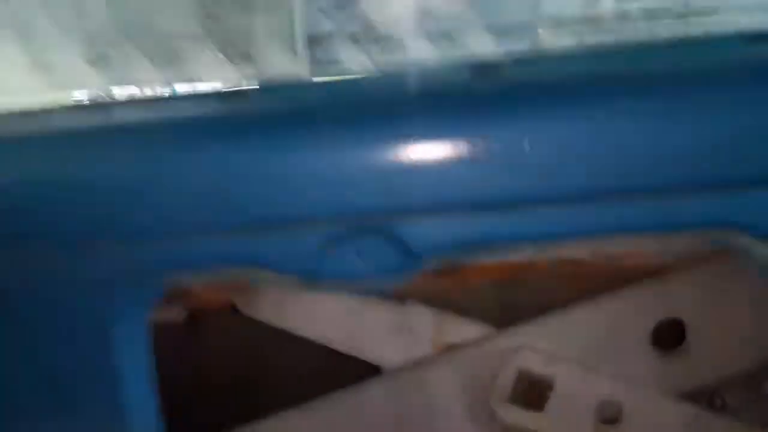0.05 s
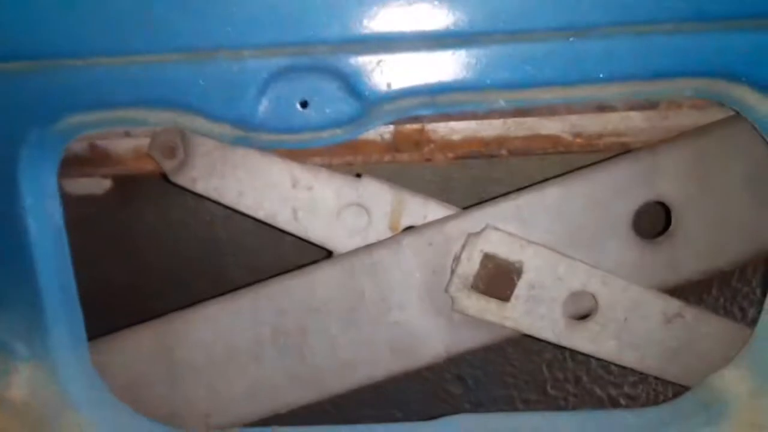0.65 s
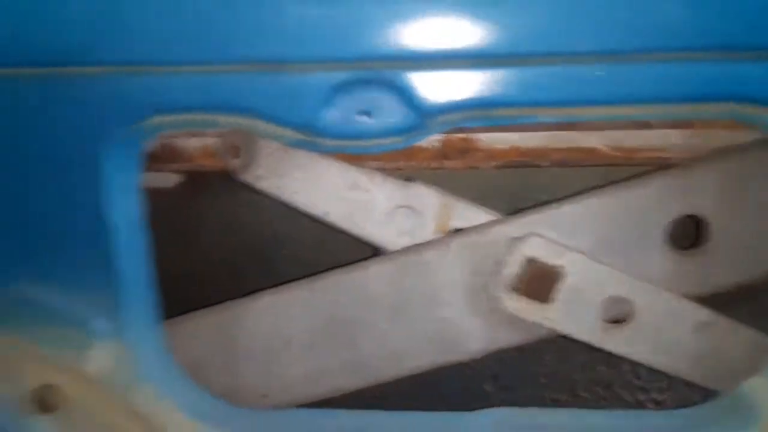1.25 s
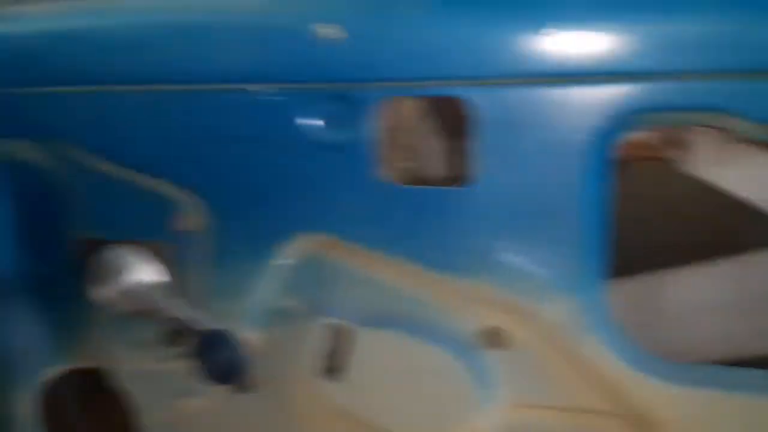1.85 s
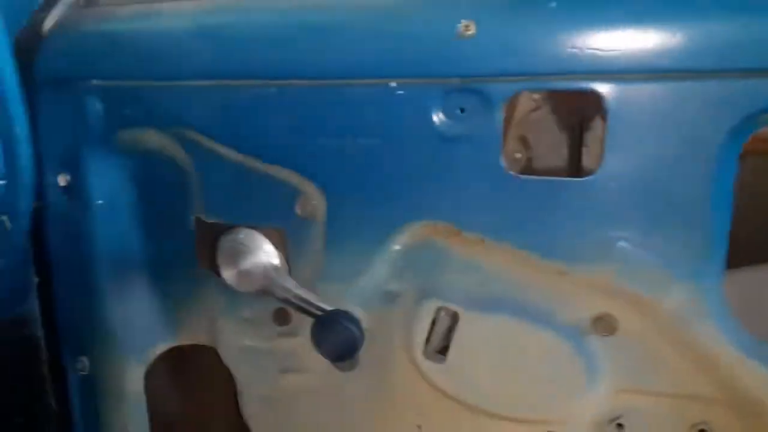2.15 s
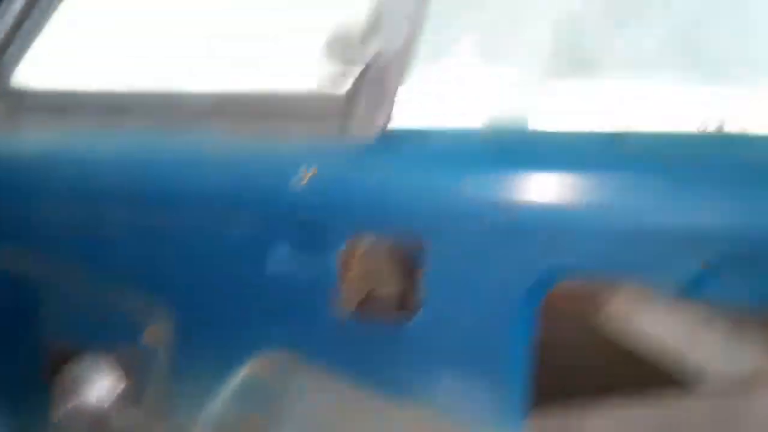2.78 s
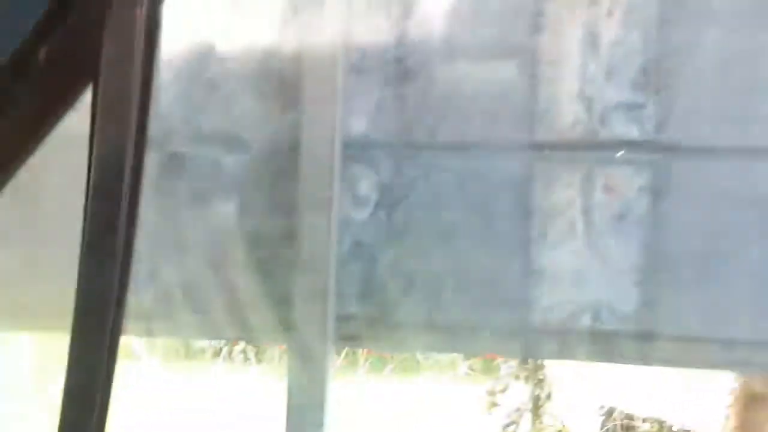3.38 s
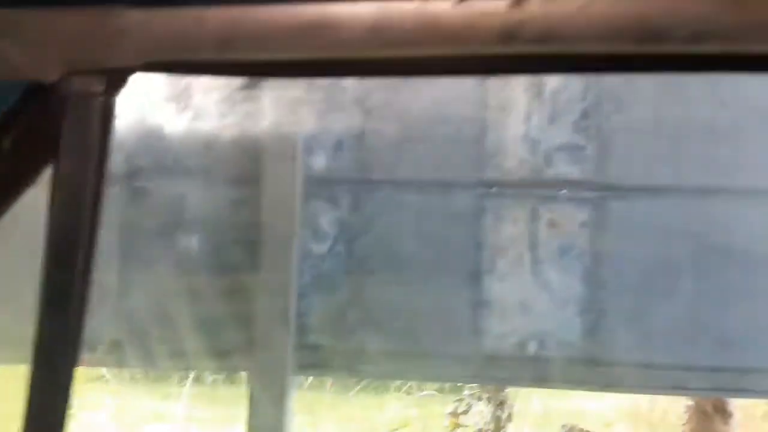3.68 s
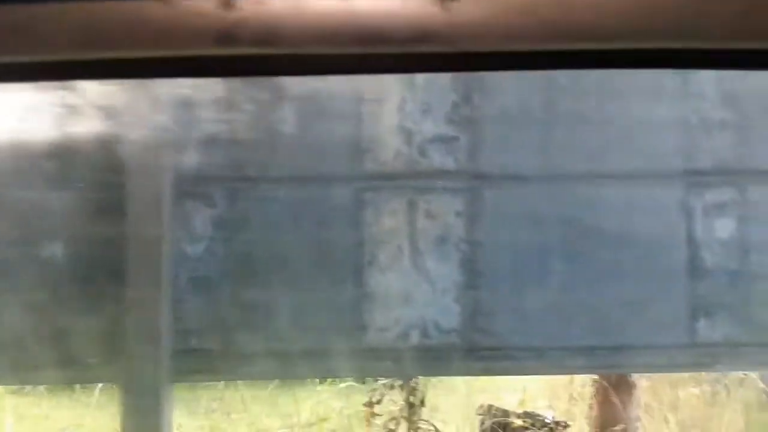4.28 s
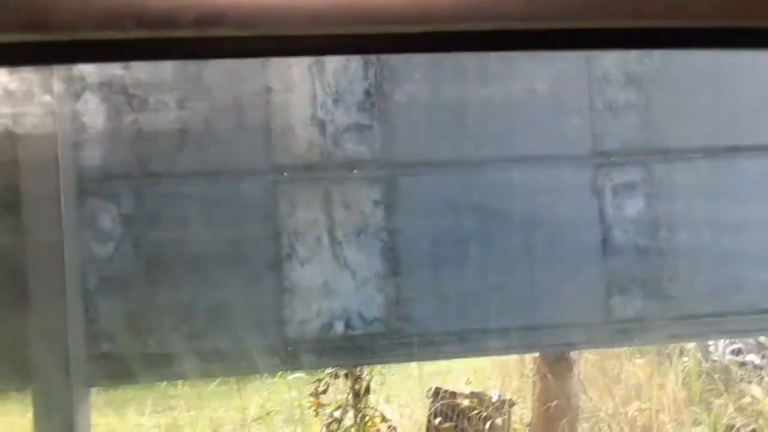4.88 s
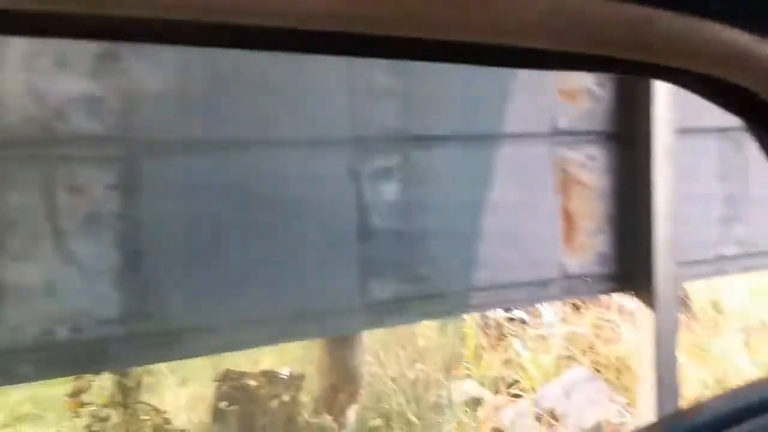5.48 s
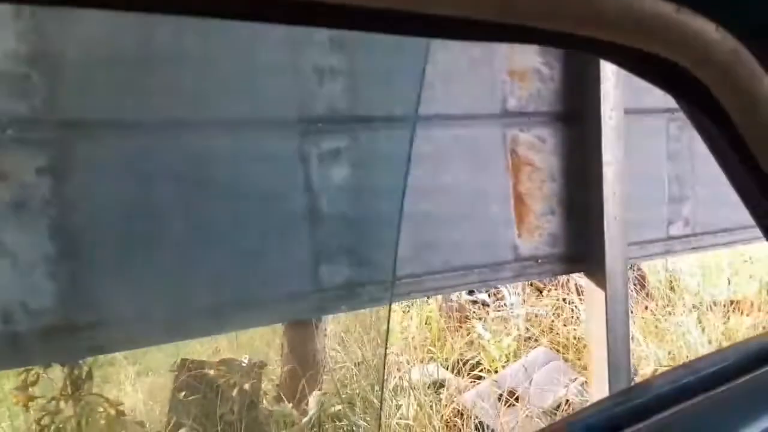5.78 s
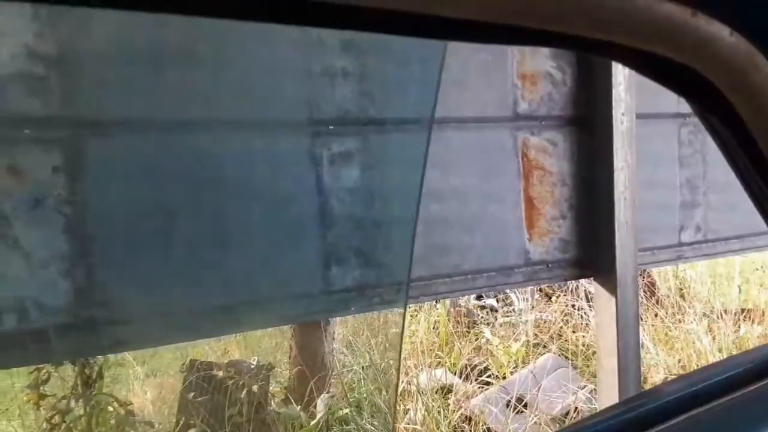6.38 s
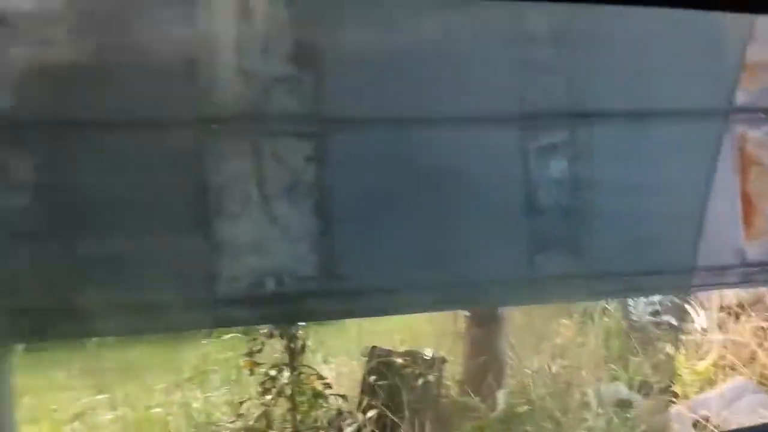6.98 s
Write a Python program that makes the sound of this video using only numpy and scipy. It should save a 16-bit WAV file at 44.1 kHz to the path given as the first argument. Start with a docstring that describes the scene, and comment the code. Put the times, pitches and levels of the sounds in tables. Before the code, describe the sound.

A high, steady cricket chorus with closer chirping spurts, over the low rumble of an idling engine heard inside the cab.

```python
"""Crickets trill in the grass outside an old truck's open window, heard from a microphone at the seat.
Their wings scrape out short tones: one sings close by in spurts over the chorus, and the cab scatters
the pulses. The V8 idles with a low, loping throb; very high insect buzz and ticks come and go. Someone
turns in the seat with a rustle and soft knocks; far off, insects hiss and an animal yelps faintly."""
import sys
import numpy as np
from scipy import signal
from scipy.fft import rfft, irfft, next_fast_len
from scipy.io import wavfile
from scipy.ndimage import map_coordinates

SR = 44100
rng = np.random.default_rng(int(sys.argv[2]) if len(sys.argv) > 2 else 0)


def store_wav(level_fs):
    """Save 16-bit WAV to argv[1]."""
    pcm = np.round(np.clip(np.atleast_2d(level_fs), -1, 1) * 32767)
    wavfile.write(sys.argv[1], SR, pcm.T.astype(np.int16))


N = 319658
TIME = np.arange(N) / SR


# the chorus in the grass, one row an insect: (wing pitch [Hz], stroke rate [1/s], relative level [dB])
CHORUS_SINGERS = [(7500, 55, 5), (7890, 120, -7.5), (7687, 63, 3.5), (7400, 63, -4), (7920, 210, -5.5),
                  (7650, 130, -2.5)]
# the chorus at the microphone: (time [s], level [dB], left minus right [dB])
CHORUS_AT_MIC = [(0, -47.5, -9), (1, -48.5, -8.5), (1.9, -47, -6), (2.4, -48, -8), (3.1, -47, -7),
                 (4, -44.5, -8), (4.6, -45, -6.5), (5.5, -46.5, -7), (6.2, -49, -7), (6.6, -46.5, -8),
                 (7.25, -46, -6)]
def crickets(chorus_echo_db=13.0):
    """Song comes in at the window and reaches each channel by its own paths; the nearest is on the right."""
    level_db, side_db = curves(CHORUS_AT_MIC)
    chorus = sum(gain_of(db) * trill(hz, rate) for hz, rate, db in CHORUS_SINGERS)
    chorus = chorus + gain_of(chorus_echo_db) * shifting_echoes(chorus, t60=0.17)
    chorus = np.array([unit_rms(channel) for channel in chorus]) * gain_of(level_db)
    strokes = near_cricket()
    near = strokes * panned(-22) + shifting_echoes(strokes, t60=.09) * gain_of(-4) * panned(-4)
    return chorus * panned(side_db) + near


# spurts of song close to the window: (start [s], length [s], peak [dB], chirp rate [1/s])
SPURTS = [(.011, .31, -39.5, 20), (.351, .16, -35.5, 21.1), (.562, .65, -33.7, 21.1),
          (1.272, .22, -37.5, 20.4), (1.58, .47, -36.3, 20.1), (2.564, .61, -35.6, 23.8),
          (3.194, .2, -33.8, 23.8), (3.404, .38, -36.5, 23.8), (3.805, .55, -37.3, 24.3),
          (4.695, .5, -35.3, 26.7), (6.622, .3, -37, 25.6), (6.934, .38, -34.5, 25.6)]
# wing strokes of one chirp, growing to its beat: (time from the beat [s], accent [dB])
CHIRP_STROKES = [(-.0345, -7), (-.019, -4.5), (-.0028, 0.5)]
def near_cricket(stroke_s=0.0065, wing_hz=7700, sweep_hz=480, scatter_hz=40, arch_db=2.0, jitter_s=0.00075):
    """Close by, runs of three-stroke chirps swell and fade; every wing stroke slides down in pitch."""
    t, out = np.arange(0, stroke_s, 1 / SR), np.zeros(N)
    for start, span, peak_db, rate in SPURTS:
        for beat in np.arange(0, span, 1 / rate):
            level_db = peak_db - arch_db * (2 * beat / span - 1) ** 2
            for offset, accent_db in CHIRP_STROKES:
                detune, force_db, late = rng.standard_normal(3)
                pitch = wing_hz + scatter_hz * detune + sweep_hz * (.5 - t / stroke_s)
                stroke = np.sin(np.pi * t / stroke_s) ** 2 * np.sin(2 * np.pi * np.cumsum(pitch) / SR)
                onset = start + beat + offset + jitter_s * late
                add(out, onset, gain_of(level_db + accent_db + force_db) * stroke)
    return out


def trill(wing_hz, rate, uneven_db=2, sweep_hz=420, scatter_hz=80, jitter=0.099, stroke_s=.0075):
    """Each wing stroke drags the scraper over the file: a short tone that sags in pitch."""
    strokes = np.cumsum(rate * (1 + jitter * drift(20) + .05 * drift(1))) / SR
    count = int(strokes[-1]) + 1
    force, detune = rng.standard_normal((2, count))[:, strokes.astype(int)]
    closing = np.minimum(strokes % 1 / rate / min(stroke_s, 1 / rate), 1)
    pitch = wing_hz + scatter_hz * detune + sweep_hz * (.5 - closing)
    swell = np.sin(np.pi * closing) ** 2 * gain_of(uneven_db * np.clip(force, -2, 1.5))
    return unit_rms(swell * np.sin(2 * np.pi * np.cumsum(pitch) / SR))


# ringing in the cricket song: (start [s], length [s], pitch [Hz], level [dB], left minus right [dB])
RINGING_SPELLS = [(.1, 1.5, 5800, -59.5, -10), (2.4, 2.9, 6600, -59.5, -14), (5.45, 1.4, 8040, -52, 0),
                  (6.1, .7, 5920, -59, -10), (-.2, .8, 8120, -54.5, 0)]
def song_ringing(rate=55):
    """Thin, narrow-pitched ringing, blurred by echoes, swells out of the cricket song and sinks back."""
    out = np.zeros((2, N))
    for start, length, hz, db, side_db in RINGING_SPELLS:
        swell = np.sqrt(abs(np.sin(np.pi * np.clip((TIME - start) / length, 0, 1))))
        song = trill(hz, rate, sweep_hz=120, scatter_hz=35, stroke_s=0.016)
        out += gain_of(db) * swell * unit_rms(with_echoes(song, t60=.2, wet_db=14)) * panned(side_db)
    return out


# idle speed: (time [s], crank speed [rpm])
IDLE_SPEED = [(0.0, 648.2), (2.1, 641.8), (2.5, 637.8), (2.9, 641), (4.9, 633.1), (5.3, 643.1),
              (7.25, 633.4)]
# where the microphone faces: (time [s], direction [0 door panel, 1 window])
MIC_FACING = [(0, 0.058), (1.5, 0.062), (3.3, 0.6), (5.3, 1)]
def engine():
    """The idling V8 from inside the cab; one four-stroke cycle takes two crank turns."""
    rpm, = curves(IDLE_SPEED)
    facing, = curves(MIC_FACING)
    cycles = np.cumsum(rpm / 120) / SR
    return exhaust(cycles, facing) + belts_and_valves(cycles, facing)


# exhaust tones: (multiple of the cycle rate, level by the door [dB], level by the window [dB])
EXHAUST_TONES = [(8, -58.5, -59), (11, -42.5, -47), (12, -58, -61), (13, -43.5, -46), (14, -57, -56),
                 (15, -48, -54), (16, -31, -34.5), (17, -55.5, -49.5), (19, -77, -83), (20, -47.5, -74),
                 (21, -40.5, -43), (22, -50.5, -52.5), (24, -44.5, -43.5), (25, -45, -56.5),
                 (27, -64.5, -68.5), (29, -58.5, -76), (30, -49.5, -65), (32, -51, -57)]
# the eight firings of one cycle: (relative strength)
FIRINGS = [0.67, 0.67, 0.86, 0.66, 0.87, 0.86, 0.88, 0.47]
# the exhaust inside the cab: (time [s], boom gain [dB], gain of the remaining drone [dB])
CAB_GAINS = [(0.0, -5, 0.5), (.75, -4, 0), (2.25, -8, -.5), (3.3, -3, 0), (4.6, -0.5, -.5), (6.6, 1, 0.5),
             (7.25, -3.5, 1.5)]
# rough gas noise: (frequency [Hz], relative density [dB])
RUMBLE_SPECTRUM = [(20, -3.5), (34, -12.5), (52, 1.5), (70, -7.5), (115, 6), (140, 4), (175, 2),
                   (215, -2.5), (250, -9.5), (340, -18.5), (700, -77)]
def exhaust(cycles, facing, lope=0.19, wobble=.09, rumble_db=-46, pipe_delay_cycles=.647):
    """Eight uneven firings a cycle sound the exhaust; the cab booms at twice the firing rate."""
    boom_db, drone_db = curves(CAB_GAINS)
    firing_phases = np.angle(np.fft.fft(FIRINGS))
    note = np.zeros(N)
    for k, door_db, window_db in EXHAUST_TONES:
        cab_db = boom_db if k == 2 * len(FIRINGS) else drone_db
        level = gain_of(door_db + facing * (window_db - door_db) + cab_db)
        phase = 2 * np.pi * k * (cycles - pipe_delay_cycles) + firing_phases[k % len(FIRINGS)]
        note += level * np.sqrt(2) * (1 + wobble * drift(3.3)) * np.cos(phase + wobble * drift(3.6))
    puffs = unit_rms(1 + lope * np.cos(4 * np.pi * cycles))  # one swell each crank turn
    rumble = gain_of(rumble_db + drone_db) * puffs * noise(RUMBLE_SPECTRUM, 0.9)
    return (note + rumble) * panned(3.9)


# belt-driven parts: (pitch [Hz], level by the door [dB], level by the window [dB])
BELT_WHINES = [(204.9, -60, -58), (281.7, -58.5, -75), (323, -64.5, -62.5), (409.5, -83, -72),
               (576, -79, -82.5), (802, -72, -84.5), (895, -86, -80), (1174, -87, -76.5)]
# valve gear: (frequency [Hz], relative density [dB])
CLATTER_SPECTRUM = [(180, -19.5), (250, 0), (345, 5), (400, -5.5), (450, -9.5), (520, -10.5), (640, -19),
                    (860, -11), (1250, -17.5), (1520, -12.5), (2100, -15), (2800, -24.5), (5000, -99)]
# belt whine and valve clatter dip early, then swell back: (time [s], gain [dB])
MECHANICAL_GAIN = [(0, 1.5), (.9, -1.5), (2.4, -5.5), (3.3, 0), (4.0, -0.5), (4.7, 1), (5.7, 0.8),
                   (6.6, 1.5), (7.25, -0.5)]
def belts_and_valves(cycles, facing, clatter_db=-57):
    """Belt-driven parts whine in step with the crank over the flickering noise of the valve gear."""
    gain_db, = curves(MECHANICAL_GAIN)
    belt_s = cycles / cycles[-1] * TIME[-1]  # a clock that runs with the crank
    whine = np.zeros(N)
    for hz, door_db, window_db in BELT_WHINES:
        level = gain_of(door_db + facing * (window_db - door_db)) * (1 + 0.5 * drift(4))
        whine += level * np.sqrt(2) * np.cos(2 * np.pi * hz * belt_s + 0.79 * drift(5))
    clatter = gain_of(clatter_db + 1.92 * drift(25)) * noise(CLATTER_SPECTRUM, 0.3)
    return gain_of(gain_db) * (whine + clatter) * panned(2.1)


# phrases of buzz outside the window: (start [s], length [s], peak [dB], left minus right [dB])
BUZZ_PHRASES = [(3.304, 1.8, -64, -1), (5.5, 1.2, -68, 17), (6.45, 0.69, -64, 6)]
# very high insect buzz, near or far: (frequency [Hz], relative density [dB])
FIZZ_SPECTRUM = [(9500, -76), (10800, -13), (12200, -4), (13800, -4.5), (14800, 4.5), (15400, 6),
                 (16000, -25)]
def insect_buzz(swell_db=8, swell_share=0.48, break_s=0.031):
    """Phrases of very high buzz swell and break off."""
    haze, buzz = noise(FIZZ_SPECTRUM, 0.03), np.zeros((2, N))
    for start, length, peak_db, side_db in BUZZ_PHRASES:
        age = TIME - start
        growth_db = swell_db * (np.clip(age / (swell_share * length), 0, 1) - 1)
        gate = np.clip(np.minimum(age, length - age) / break_s, 0, 1)
        buzz += gain_of(peak_db + growth_db) * gate * haze * panned(side_db)
    return buzz


# runs of very high insect ticks: (start [s], length [s], level [dB])
TICK_RUNS = [(4.062, .06, -49.5), (4.265, .635, -49.5), (6.761, .5, -49)]
# their rasp: (frequency [Hz], relative density [dB])
TICK_SPECTRUM = [(10500, -50), (12000, -13), (13800, -8), (14700, 0), (15300, 1), (15900, -14)]
def insect_ticks(ticks_per_s=43.3, uneven_db=1.3, tick_s=.0035):
    """Runs of soft, raspy ticks near 15 kHz stand out on the right."""
    rasp, ticks = noise(TICK_SPECTRUM, 0)[0], np.zeros(N)
    pulse = np.hanning(round(tick_s * SR))
    for start, length, db in TICK_RUNS:
        for beat in np.arange(0, length, 1 / ticks_per_s):
            force = min(rng.standard_normal(), 1)
            add(ticks, start + beat - tick_s / 2, gain_of(db + uneven_db * force) * pulse)
    return with_echoes(ticks * rasp, t60=.03, wet_db=-12) * panned(-14)


# turns in the seat beside the microphone: (start [s], length [s], level [dB])
SEAT_TURNS = [(-.3, .4, -51), (2.8, 0.91, -54), (4.915, 0.25, -57.5)]
# rubbing cloth: (frequency [Hz], relative density [dB])
CLOTH_SPECTRUM = [(250, -26), (600, 11), (1700, 14.5), (3000, 11.5), (5000, 12), (8000, -65), (10000, -7.5),
                  (15000, 3.5)]
def clothes(rise_s=0.32, fade_s=0.2, flutter_db=1.5):
    """Cloth rustles as someone turns and then settles."""
    rubbing = np.zeros(N)
    for start, length, db in SEAT_TURNS:
        age = TIME - start
        rubbing += gain_of(db) * np.clip(age / rise_s, 0, 1) * np.exp(-np.maximum(age - length, 0) / fade_s)
    return rubbing * gain_of(flutter_db * drift(30)) * noise(CLOTH_SPECTRUM, 0) * panned(-1.0)


# knocks within arm's reach: (time [s], thud level [dB], click level [dB], hardness [dB/octave])
KNOCKS = [(.2, -61, -68, 2.5), (0.32, -58.5, -70, 2), (0.602, -55.5, -75, -4.5), (3.244, -49, -58, .3),
          (3.657, -46, -60, -3.5), (4.208, -68, -38, 2), (4.237, -50, -56, 1.5), (4.938, -51.5, -30, -3.2),
          (4.961, -57, -40, -2), (5.35, -68, -47, -1), (5.609, -57, -78, -4.5), (7.175, -66, -74, 3)]
# broad resonances of the door panel: (frequency [Hz], relative level [dB], t60 [s])
DOOR_MODES = [(194, -0.5, 0.15), (293, -13, 0.12), (374, -4, .13), (590, -18, 0.096), (940, -19, .06),
              (1600, -25.5, .04)]
# a thin, bright click, with the recorder's dip near 9.5 kHz: (frequency [Hz], gain [dB])
CLICK_SPECTRUM = [(500, -8), (2800, -4), (3700, -6), (7000, 10), (9500, -29), (12500, 2), (15000, -6)]
def knocks(rise_cycles=2.9, click_s=0.00037, band_ratio=1.22):
    """A soft push bumps the damped door panel into a dull thud; some knocks start with a thin click."""
    t, thuds, clicks = np.arange(SR // 4) / SR, np.zeros(N), np.zeros(N)
    taps = np.fft.fftshift(irfft(gain_of(db_at(CLICK_SPECTRUM, np.fft.rfftfreq(64, 1 / SR)))))
    for start, thud_db, click_db, hardness in KNOCKS:
        scuff, snap = rng.standard_normal((2, len(t)))
        for hz, db, t60 in DOOR_MODES:
            band = signal.butter(2, [hz / band_ratio, hz * band_ratio], "band", fs=SR, output="sos")
            envelope = (1 - np.exp(-t * hz / rise_cycles)) * gain_of(-60 * t / t60)
            ring = unit_rms(signal.sosfilt(band, scuff) * envelope)
            tilt_db = hardness * np.log2(hz / DOOR_MODES[0][0])
            add(thuds, start, gain_of(thud_db + db + tilt_db) * ring)
        click = np.convolve(snap * np.exp(-t / click_s), taps)
        add(clicks, start - len(taps) / 2 / SR, gain_of(click_db) * click)
    return (with_echoes(thuds, t60=.07, wet_db=-9) + with_echoes(clicks, t60=.04, wet_db=-10)) * panned(3)


# two crowds of insects far out in the grass: (time [s], lower crowd [dB], higher crowd [dB])
CROWD_LEVELS = [(0, -51.5, -55), (1.18, -52.5, -53), (2.5, -56, -52.5), (3.2, -51, -50.5),
                (4.6, -52.5, -51.5), (5.57, -53.5, -53.5), (7.2, -51, -52)]
# the lower crowd: (frequency [Hz], relative density [dB])
LOW_CROWD_SPECTRUM = [(3500, -21), (4400, -13.5), (4950, -9), (5300, 0.5), (5750, 2.5), (6100, 2.5),
                      (7000, 0.5), (8500, -57)]
# the higher crowd: (frequency [Hz], relative density [dB])
HIGH_CROWD_SPECTRUM = [(5000, -45.5), (5900, -13), (6200, 4), (6400, 6.5), (6680, 5.5), (6900, 2),
                       (7250, 2.5), (7600, -20), (8200, -2), (9000, -30), (9500, -88)]
def far_insects(swell_db=1.1, fizz_db=-63):
    """Countless distant singers merge into two bands of hiss that swell apart, and a high fizz."""
    low_db, high_db = curves(CROWD_LEVELS)
    low = gain_of(low_db + swell_db * drift(2.4)) * noise(LOW_CROWD_SPECTRUM, 0.041) * panned(-10.0)
    high = gain_of(high_db + swell_db * drift(3)) * noise(HIGH_CROWD_SPECTRUM, 0.25) * panned(-19.0)
    fizz = gain_of(fizz_db - 0.8 * drift(1.2)) * noise(FIZZ_SPECTRUM, 0.029) * panned(-0.31)
    return low + high + fizz


# an animal far off: (start [s], pitch [Hz], level [dB], length [s], brightness [dB/harmonic])
YELPS = [(1.13, 482, -62.5, .07, 1), (1.17, 565, -67.5, .09, -5), (1.83, 480, -63, .06, -1),
         (1.85, 565, -64.5, .1, -5), (5.8, 478, -65.5, .09, 3), (5.85, 545, -66, .1, -2),
         (6.11, 503, -71, .07, 4), (6.19, 535, -66, .13, -3), (6.51, 503, -72, .09, 6)]
# resonance of its throat: (frequency [Hz], gain [dB])
THROAT = [(480, -10), (560, 3), (970, 3), (1120, -3), (1480, -5), (1700, -13)]
def far_yelps(sag=0.042):
    """Short calls of three unsteady harmonics, sagging in pitch and blurred by the distance."""
    out = np.zeros(N)
    for start, hz, db, length, brightness in YELPS:
        t = np.arange(0, length, 1 / SR)
        quaver = .035 * drift(120)[:len(t)]
        phase = 2 * np.pi * np.cumsum(hz * (1 + quaver + sag * (.5 - t / length))) / SR
        call = sum(gain_of(db_at(THROAT, k * hz) + brightness * (k - 1)) * np.sin(k * phase)
                   for k in range(1, 4))
        add(out, start, gain_of(db) * np.sqrt(2) * call * np.sin(np.pi * t / length))
    return with_echoes(out, t60=.3, wet_db=0)


# a faint, wide hush, with the recorder's dip near 9.5 kHz: (frequency [Hz], relative density [dB])
HUSH_SPECTRUM = [(200, -16), (500, 4), (900, 2), (1600, 2), (2200, -5), (3000, -9.5), (5000, -1),
                 (8000, -25), (9500, -92), (16000, -36)]
def hush(level_db=-63, flicker_db=.5):
    """Soft noise behind everything; its level flickers slightly."""
    return gain_of(level_db + flicker_db * drift(20)) * noise(HUSH_SPECTRUM, 0.058)


def with_echoes(x, t60, wet_db):
    """Direct sound plus dense echoes from the cab's glass and bare steel, different in each channel."""
    t = np.arange(SR // 6) / SR
    tail = rng.standard_normal((2, len(t))) * gain_of(-60 * t / t60) * (t > .002)
    tail /= np.linalg.norm(tail, axis=1, keepdims=True)
    return x + gain_of(wet_db) * signal.oaconvolve(x[None], tail, axes=1)[:, :N]


def shifting_echoes(x, t60, step_s=.5):
    """Cab echoes alone, their pattern changing as the microphone moves."""
    out = np.zeros((2, N))
    for start in np.arange(-step_s, TIME[-1], step_s):
        part = x * np.sin(np.pi * np.clip((TIME - start) / (2 * step_s), 0, 1))
        out += with_echoes(part, t60, 0) - part
    return out


def gain_of(db):
    """Decibels to amplitude."""
    return 10 ** (np.asarray(db) / 20)


def unit_rms(x):
    """Scales to rms 1."""
    return x / np.sqrt(np.mean(x ** 2) + 1e-20)


def db_at(spectrum, hz):
    """A spectrum's level, joined on a log-frequency axis."""
    f, db = np.transpose(spectrum)
    return np.interp(np.log(hz + 1), np.log(f + 1), db)


def curves(rows):
    """Each column of a timed table, at every sample."""
    times, *columns = np.transpose(rows)
    return [np.interp(TIME, times, column) for column in columns]


def add(mix, start_s, sound):
    """Mixes a sound in at the given time."""
    part = mix[max(round(start_s * SR), 0):][:len(sound)]
    part += sound[:len(part)]


def panned(left_db):
    """Left and right gains of mean power 1."""
    left = gain_of(np.atleast_1d(left_db))
    return np.array([left, np.ones_like(left)]) / np.sqrt((1 + left ** 2) / 2)


def drift(rate_hz):
    """Random wander of rms 1, up to about the given rate."""
    knots = rng.standard_normal(8192)
    return unit_rms(map_coordinates(knots, [TIME * rate_hz * 2], order=1, mode="wrap"))


def noise(spectrum, likeness):
    """Two partly alike channels of coloured noise, rms 1."""
    size = next_fast_len(N)
    a, b = rng.standard_normal((2, size))
    pair = rfft([a, likeness * a + np.sqrt(1 - likeness ** 2) * b])
    colour = gain_of(db_at(spectrum, np.fft.rfftfreq(size, 1 / SR)))
    return unit_rms(irfft(pair * colour, size)[:, :N])


def scene():
    """Everything that reaches the microphone at the seat."""
    return (engine() + far_insects() + insect_buzz() + insect_ticks() + clothes() + hush()
            + knocks() + far_yelps() + crickets() + song_ringing())


def record(dry):
    """The recorder passes sound up to 15.7 kHz."""
    lowpass = signal.firwin(511, 15700, window=("kaiser", 9), fs=SR)
    return signal.oaconvolve(dry, lowpass[None], "same")


dry = scene()
out = record(dry)
store_wav(out)
```